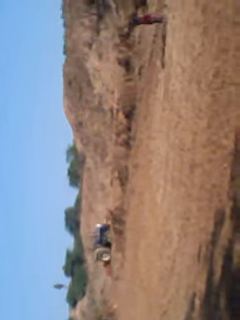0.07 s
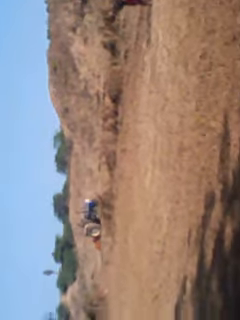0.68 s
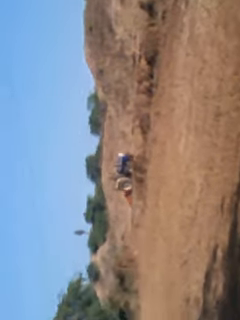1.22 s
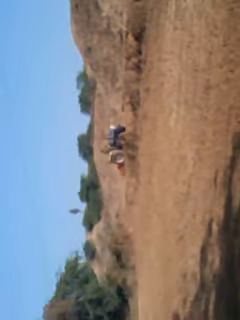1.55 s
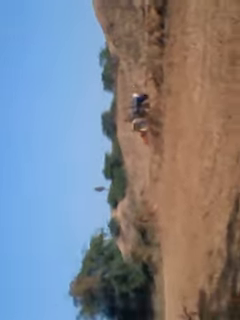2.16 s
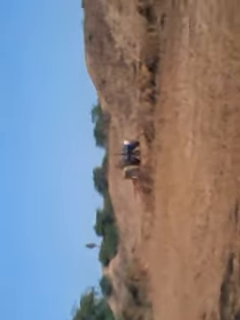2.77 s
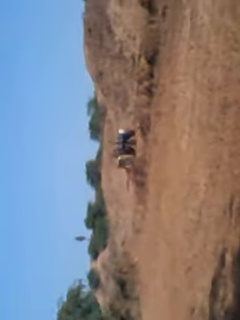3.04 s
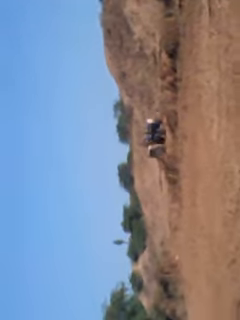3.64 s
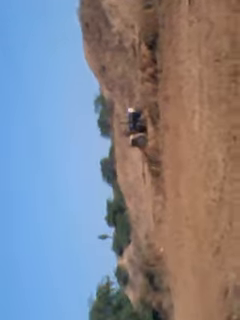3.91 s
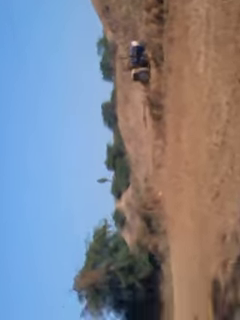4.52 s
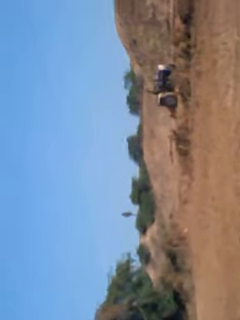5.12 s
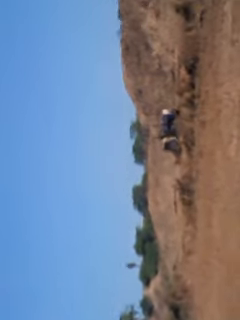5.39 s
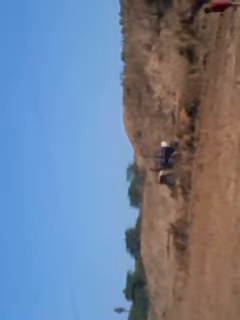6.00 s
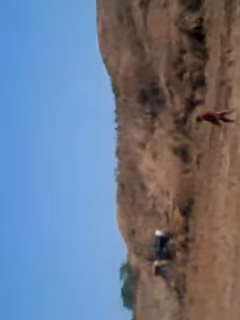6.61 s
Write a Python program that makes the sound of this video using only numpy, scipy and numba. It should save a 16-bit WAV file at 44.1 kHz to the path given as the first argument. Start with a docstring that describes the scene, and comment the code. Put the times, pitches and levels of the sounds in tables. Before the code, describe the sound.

A tractor's diesel engine labours some way off on an open dirt slope, heard through a phone for about seven seconds. It runs without a break, a rapid knocking clatter with an airy hiss and a faint thin whistle on top. Its speed wavers slightly, and the exhaust barks harder in short surges. The strongest run of barks comes from 0.1 to 0.5 seconds, with more near 0.9, 1.4, 2.2, 2.5, 3, 3.7, 4.5 and 5.4 seconds and a last hard cluster around 6.3. Small, sharp metallic clanks dot the clatter, near 0.9, 1.9, 2.5, 3.8 and 6.4 seconds, the clearest at 3.8. A light breeze puffs softly against the microphone at the very start and again around 1.4 seconds. The clatter slowly swishes as it reflects off the hard ground, and the engine is still running at the end.

```python
"""A tractor's diesel engine labours on a dirt slope some way off, heard in the open through a phone.
Each firing sends a bark down the exhaust pipe. The governor, which sets the fuel, keeps overshooting:
about once a second the speed sags and the barks get harder. Between firings the engine block clatters
and air hisses. The rig clanks now and then, and a light breeze touches the microphone.
The hard ground reflects the sound with a shifting delay, so the clatter slowly swishes."""
import sys
import numpy as np
from scipy import signal
from scipy.fft import rfft, irfft
from scipy.io import wavfile
from numba import njit

SR = 44100
rng = np.random.default_rng(int(sys.argv[2]) if len(sys.argv) > 2 else 0)


def waveform_to_disk(signal):
    """Save audio, clipped to [-1, 1], as 16-bit WAV at the path in sys.argv[1]."""
    frames = np.transpose(np.atleast_2d(signal))
    scaled = np.clip(frames, -1, 1) * 32767
    samples = np.round(scaled).astype(np.int16)
    wavfile.write(sys.argv[1], SR, samples)


N = 302967
T = np.arange(N) / SR
HZ = np.maximum(np.fft.rfftfreq(N, 1 / SR), 1e-3)


def undb(db):
    """Turn decibels into a number to multiply by."""
    return 10 ** (np.asarray(db) / 20)


def unit(x):
    """Scale a sound to a standard strength (rms 1)."""
    return x / np.std(x)


def curves(table):
    """Join a table's rows with straight lines in time, one curve for each later column."""
    seconds, *columns = np.transpose(table)
    return [np.interp(T, seconds, column) for column in columns]


def noise():
    """White noise."""
    return rng.standard_normal(N)


def wander(rate):
    """A random curve, mostly within -1 to 1, that turns rate times a second."""
    return np.interp(T * rate, np.arange(4096), rng.standard_normal(4096))


def colour(x, points):
    """Make each frequency louder or softer, following (Hz, dB) points."""
    hz, db = np.transpose(points)
    return irfft(rfft(x) * undb(np.interp(np.log(HZ), np.log(hz), db)), N)


def resonate(x, hz, width):
    """Make a sound ring near one pitch; a smaller width rings longer."""
    return irfft(rfft(x) / (1 + 1j * (HZ ** 2 - hz ** 2) / (HZ * width)) ** 2, N)


@njit
def sweep(x, hz, width):
    """Let through only a band around a moving pitch."""
    out = np.empty(len(x))
    band_memory = low_memory = 0.
    for i in range(len(x)):
        tuning, damping = np.tan(np.pi * hz[i] / SR), width / hz[i]
        band = (band_memory + tuning * (x[i] - low_memory)) / (1 + tuning * (tuning + damping))
        band_memory = 2 * band - band_memory
        low_memory += 2 * tuning * band
        out[i] = damping * band
    return out


def strikes(times, sizes):
    """Sharp clicks of the given sizes at the given times."""
    return np.bincount(np.clip(times * SR, 0, N - 1).astype(int), sizes, N)


def bursts(times, sizes, rise_s, fall_s):
    """A loudness curve that swells and dies away at each of the times."""
    t = T[:SR // 8]
    shape = (1 - np.exp(-t / rise_s)) ** 2 * np.exp(-t / fall_s)
    return signal.fftconvolve(strikes(times, sizes), shape / shape.max())[:N]


# Puffs of wind. Each row: middle in seconds, half length in seconds, level in dB.
WIND_PUFFS = [(.1, 0.1, -44), (.35, 0.12, -47), (1.366, 0.086, -48)]

def breeze(calm_db=-72):
    """Wind rumbles on the microphone and swells in brief puffs."""
    puffs = sum(undb(db) * np.exp(-((T - s) / half) ** 2) for s, half, db in WIND_PUFFS)
    rumble = colour(noise(), [(8, -16), (22, 2.5), (62, -9.5), (100, -21), (270, -0.5), (900, -51)])
    return (undb(calm_db) + puffs) * unit(rumble)


# Clanks of the rig, plus two brief, sharp accents in the clatter near 2 to 2.5 kHz (at 4.087 and 5.673 s).
# Each row: start in seconds, strength in dB, pitch in Hz.
SHARP_SOUNDS = [(.92, -16, 3760), (1.888, -14, 6740), (2.508, -15, 4370), (2.602, -17.5, 4060),
                (3.66, -18, 4400), (3.773, -10.5, 4100), (4.087, -14, 2500), (4.779, -17, 6900),
                (5.673, -13.5, 2030), (6.426, -14, 2880)]

def clanks_and_accents(ring_db=-6, crack_db=-11):
    """Each clank or accent is a broad crack and a short ring."""
    out = 0
    for start, db, hz in SHARP_SOUNDS:
        ring = undb(ring_db) * unit(resonate(noise(), hz, 500))
        crack = undb(crack_db) * unit(resonate(noise(), 3600, 3300))
        out += (ring + crack) * bursts(np.array([start]), undb([db]), rise_s=.0006, fall_s=.006)
    return out


# The echo's delay as tractor and phone move. Each row: time in seconds, delay in milliseconds.
ECHO_DELAYS = [(0, 1.31), (.65, 1.27), (1.5, 1.34), (2.1, 1.18), (2.95, 1.15), (4.2, 1.2), (4.85, 1.19),
               (5.15, 1.4), (6.3, 1.4), (6.65, 1.18)]

def ground_echo(x, level_db=-15.5, dull_hz=4500):
    """Hard dirt returns a duller copy a moment later; mixed with the direct sound, it swishes."""
    delay_ms, = curves(ECHO_DELAYS)
    dulled = irfft(rfft(x) / np.hypot(1, HZ / dull_hz), N)
    return undb(level_db) * np.interp(T - delay_ms / 1000, T, dulled)


# The governor's moves. Each row: start in seconds, length in seconds, change of load in dB.
FUEL_MOVES = [(0.088, .45, 10.5), (0.88, 0.16, 10.5), (1.296, 0.23, 8), (1.698, .16, 4.5),
              (1.937, 0.12, -5.5), (2.117, 0.14, 7.5), (2.28, 0.14, -9.5), (2.445, 0.2, 10.5),
              (2.842, 0.12, 8), (3.004, 0.19, 6.5), (3.61, .2, 10), (4.077, 0.21, -6.5), (4.377, 0.24, 8),
              (5.341, 0.091, 10.5), (5.798, 0.14, -5), (6.062, 0.5, 4.5), (6.176, 0.21, 4)]

def load(times, open_s=.068, close_s=.076):
    """How hard the engine works, in dB above usual: each fuel change comes in, holds and lets go."""
    load_db = 0
    for start, length, db in FUEL_MOVES:
        coming = np.interp(times - start, [-open_s / 2, open_s / 2], [0, 1])
        going = np.interp(times - start - length, [-close_s / 2, close_s / 2], [1, 0])
        load_db += db * coming * going
    return load_db


# Slow changes in loudness. Each row: time in seconds, then a change in dB for
# the block, the fan, and the low, middle and high bands of clatter.
SWELL_LEVELS = [(0, 2, -0.5, -13, -8, -6.5), (.7, 0, 1, -8, -9.5, -7.5), (1.3, -1.5, 0.5, -6.5, -25, -24),
                (2.4, 0.5, 1.4, -11, -5, -28.5), (3.1, -0.4, 1.5, -7, -6, -21), (4.1, 1, 1, -25, -7, -23),
                (4.9, -1.8, -0.2, -22, -13.5, -9), (5.7, 0.6, 0.8, -11, -11, -21.5),
                (6.87, 0.5, -0.5, -17.5, -4, -13)]

def swells():
    """The block, the fan and the three bands of clatter slowly swell and fade by these dB."""
    block, fan, *bands = curves(SWELL_LEVELS)
    return {"block": block, "fan": fan, "bands": bands}


def knock(firings, lead_s=.002, fall_s=.0062, depth=.95, scatter_db=3.5):
    """Noise that surges each time fuel burns, harder under load."""
    sizes = undb(.35 * load(firings) + scatter_db * rng.standard_normal(len(firings)).clip(-2, 2))
    surges = bursts(firings - lead_s, sizes, rise_s=.00038, fall_s=fall_s)
    return unit(noise() * (1 + depth * surges))


# The tone of the fan and air. Each row: frequency in Hz, boost or cut in dB.
AIR_TONE = [(1000, -24.5), (2400, -3), (3000, -4.5), (3500, -1), (4800, -1.5), (5350, -1), (6100, 1),
            (6450, 2.5), (6900, -0.5), (7300, 1.5)]

def hiss(firings, air_db=6.5, tick_db=-10, whistle_db=-16):
    """Fan air pulses, metal ticks around each firing, and a thin whistle sits on top."""
    air = unit(colour(knock(firings, lead_s=.0026, fall_s=.0027, depth=.32, scatter_db=8), AIR_TONE))
    ticks = 0
    for hz in np.linspace(3300, 6900, num=9):
        timing, strength = rng.standard_normal((len(firings), 2)).clip(-2, 2).T
        taps = bursts(firings + .0024 + .0037 * timing, undb(6.8 * strength), rise_s=.00059, fall_s=.0028)
        ticks += resonate(noise() * taps, hz, 250) * undb(2 * wander(1.9))
    whistle = unit(resonate(noise(), 6100, 99)) * undb(2 * wander(2))
    mix = undb(air_db) * air + undb(tick_db) * unit(ticks) + undb(whistle_db) * whistle
    return undb(swells()["fan"]) * mix


# The tone of the engine's casing. Each row: frequency in Hz, boost or cut in dB.
CASING_TONE = [(110, -46), (180, -7), (270, -14.5), (410, -4), (520, -0.5), (900, -3), (1600, -4),
               (3000, -9.5), (7000, -18.5)]

def casing_noise(firings, gain_db=-4):
    """The shaken casing gives a broad noise under the clatter."""
    shaking = knock(firings, lead_s=.0022, fall_s=.0022, depth=.88, scatter_db=2.5)
    return undb(gain_db) * unit(colour(shaking, CASING_TONE))


# The clatter's bright ring. Each row: time in seconds, pitch in Hz, level in dB at the usual load.
RING_PATH = [(0, 1835, -30), (.6, 1920, -33.5), (.95, 2145, -30), (2.0, 1870, -33.5), (3.0, 1934, -29.5),
             (3.8, 1900, -30), (4.8, 1903, -32), (5.45, 1983, -28.5), (6.87, 1905, -27)]

def bright_ring(firings, width_hz=360.0):
    """The knocking rings at a pitch that shifts with the listening angle."""
    hz, db = curves(RING_PATH)
    band = sweep(knock(firings), hz, width_hz)
    ring = sweep(band, hz, width_hz)  # a second pass makes the pitch clearer
    return unit(ring) * undb(db + .1 * load(T))


# Bands of clatter, low to high. Each row: pitch in Hz, width in Hz.
CLATTER_BANDS = [(1500, 490), (2550, 600), (4750, 480)]

def band_clatter(firings):
    """Three bands of clatter, near 1.5, 2.5 and 4.75 kHz, slowly swell and fade."""
    return sum(undb(db) * unit(resonate(knock(firings), hz, width))
               for (hz, width), db in zip(CLATTER_BANDS, swells()["bands"]))


# Where the engine block rings. Each row: pitch in Hz, width in Hz, strength in dB.
BLOCK_RINGS = [(706, 214, -3.5), (840, 260, -5), (1008, 200, -8), (1185.4, 236, 3.5), (3450, 66, -19.5),
               (3948, 190, -10)]

def block_clatter(firings, gain_db=1.05, flicker_db=1.3):
    """The knocking rings the engine block; each pitch flickers in the moving air."""
    rings = sum(undb(db + flicker_db * wander(7)) * resonate(knock(firings), hz, width)
                for hz, width, db in BLOCK_RINGS)
    return unit(rings) * undb(gain_db + swells()["block"])


# Low exhaust tones. Each row: multiple of the firing rate, strength in dB.
THROB_TONES = [(1, -1.5), (2, -6.5), (3, -6.5), (4, -8), (5, -7.5), (6, -12.5), (10, -2.5)]

def throb(cycles, gain_db=-51):
    """The slow push of the gas makes low tones that swell with the load."""
    tones = sum(undb(db) * np.cos(2 * np.pi * k * cycles + k * k) for k, db in THROB_TONES)
    return np.sqrt(2) * tones * undb(gain_db + .29 * load(T))


# Where the exhaust pipe rings. Each row: pitch in Hz, width in Hz, strength in dB.
PIPE_RINGS = [(706, 330, 1.5), (845, 315, -1), (1140, 220, -10.5)]
# The tone of the pipe's mouth. Each row: frequency in Hz, cut in dB.
MOUTH_TONE = [(250, -22.5), (480, -10.5), (640, -2)]

def pipe(x):
    """The pipe rings, neighbouring pitches swinging opposite ways; its small mouth lets out little bass."""
    rings = sum((-1) ** k * undb(db) * resonate(x, hz, width)
                for k, (hz, width, db) in enumerate(PIPE_RINGS))
    return colour(rings, MOUTH_TONE)


# Single firings that crack out above the rest. Each row: time in seconds, strength in dB.
HARD_BARKS = [(.115, -10), (.162, -11.5), (.307, -4), (.331, -3.5), (.378, -7.5), (.448, -8), (.472, -7),
              (.94, -8.5), (1.457, -5), (2.201, -6), (2.511, -4), (2.582, -5), (2.888, -11.5), (3.099, -12),
              (3.643, -7), (3.665, -10.5), (6.256, -6), (6.279, -4.5), (6.302, -8.5)]

def exhaust(firings, usual_db=-25.5, uneven_db=2, hard_trim_db=-3, gas_db=-31):
    """Each firing sends a pressure kick and a puff of rough gas down the pipe; more fuel, harder bark."""
    strength, timing = rng.standard_normal((len(firings), 2)).clip(-1.6, 1.6).T
    peak_db = usual_db + load(firings) + uneven_db * strength
    times = firings + .0004 * timing
    for s, db in HARD_BARKS:
        nearest = np.argmin(abs(firings - s))
        times[nearest], peak_db[nearest] = s, db + hard_trim_db
    times -= .0004  # the valve opens a moment before the pipe rings fully
    sizes = undb(peak_db)
    gas = undb(gas_db) * noise() * bursts(times - .002, sizes, rise_s=.0019, fall_s=.0033)
    one_kick_peak = abs(pipe(signal.unit_impulse(N))).max()
    return pipe(strikes(times, sizes) + gas) / one_kick_peak


# The engine's speed. Each row: time in seconds, firings per second.
ENGINE_SPEED = [(0.0, 40.99), (0.46, 42.68), (1.15, 42.81), (1.24, 42.15), (1.7, 43.31), (2.27, 42.56),
                (2.4, 41.21), (2.6, 42.43), (2.96, 42.74), (3.47, 41.97), (3.93, 43.84), (4.24, 42.12),
                (4.94, 44.03), (5.21, 42.75), (5.75, 44.23), (6.2, 42.61), (6.47, 43.76), (6.87, 44.44)]

def crankshaft(first_firing_s=.0188):
    """The turning shaft counts up cycles; the engine fires at each whole number."""
    rate, = curves(ENGINE_SPEED)
    cycles = np.cumsum(rate) / SR - first_firing_s * rate[0]
    firings = np.interp(np.arange(int(cycles[-1]) + 1), cycles, T)
    return cycles, firings


def scene():
    """One crankshaft times the clatter, the hiss and the exhaust; one load makes them all swell."""
    cycles, firings = crankshaft()
    clatter = (block_clatter(firings) + band_clatter(firings)) * undb(-28 + .11 * load(T))
    noise_gain = undb(-28 + .12 * load(T))
    clatter += noise_gain * casing_noise(firings) + bright_ring(firings)
    engine = clatter + noise_gain * hiss(firings) + exhaust(firings)
    return (engine + ground_echo(engine) + throb(cycles) + clanks_and_accents() + breeze())[None]


def record(dry):
    """The phone cuts off the treble above about 7 kHz."""
    return signal.sosfilt(signal.cheby1(12, .2, 7020, fs=SR, output="sos"), dry)


dry = scene()
out = record(dry)
waveform_to_disk(out)
```